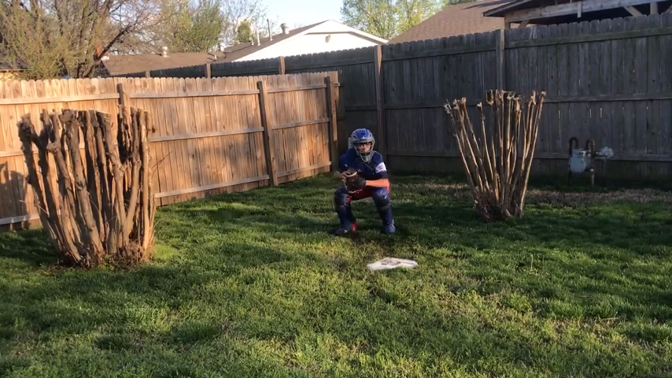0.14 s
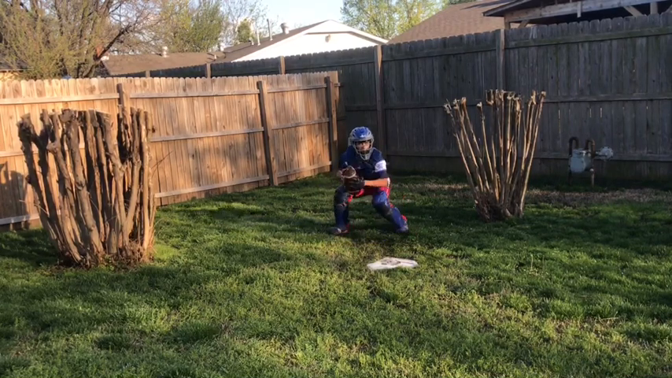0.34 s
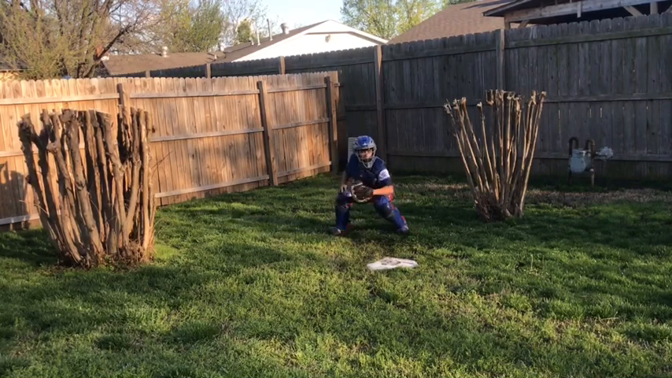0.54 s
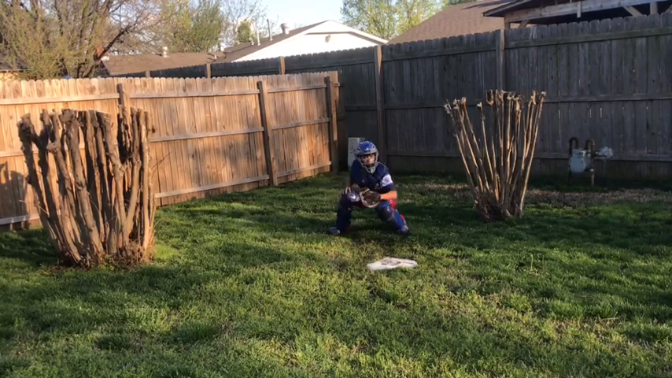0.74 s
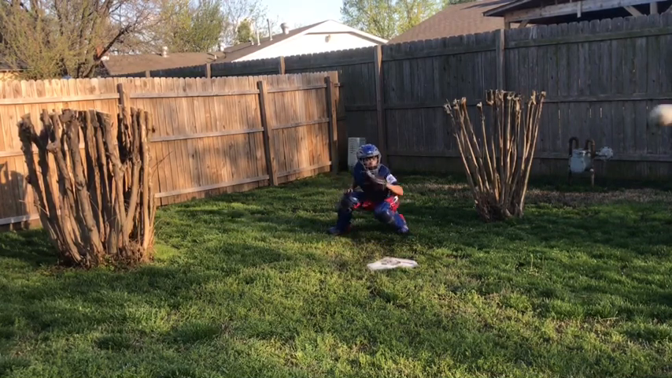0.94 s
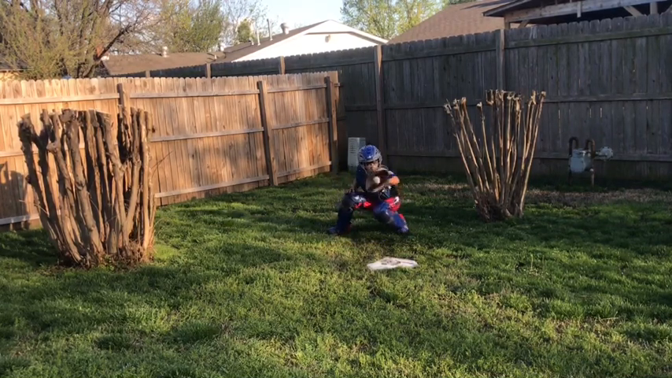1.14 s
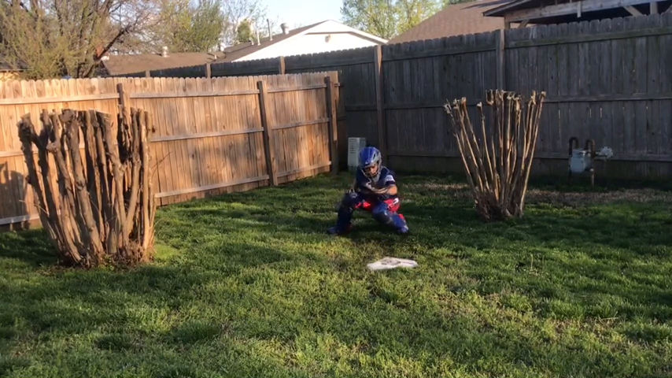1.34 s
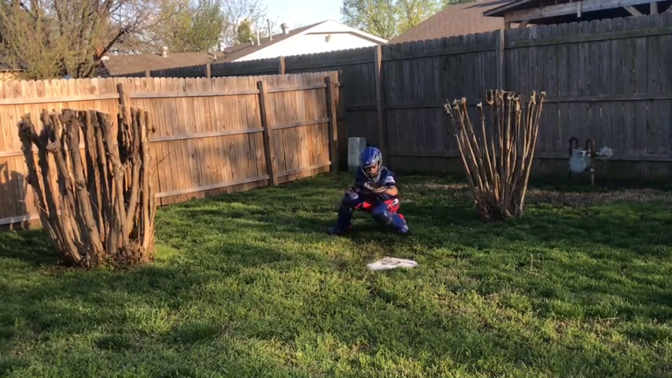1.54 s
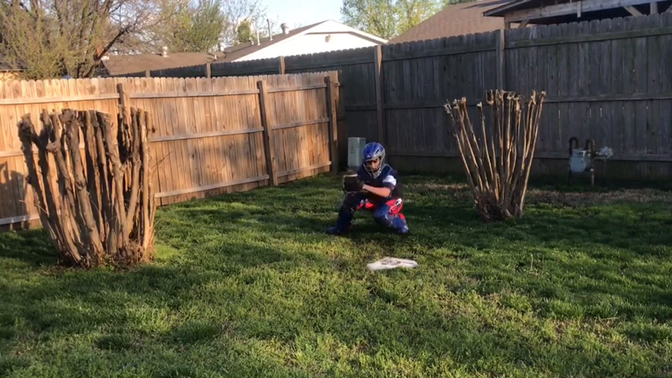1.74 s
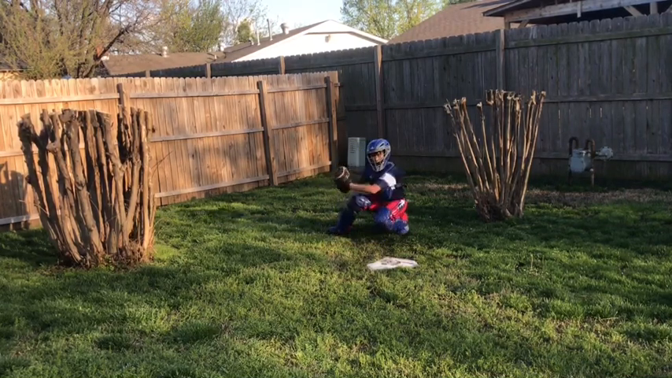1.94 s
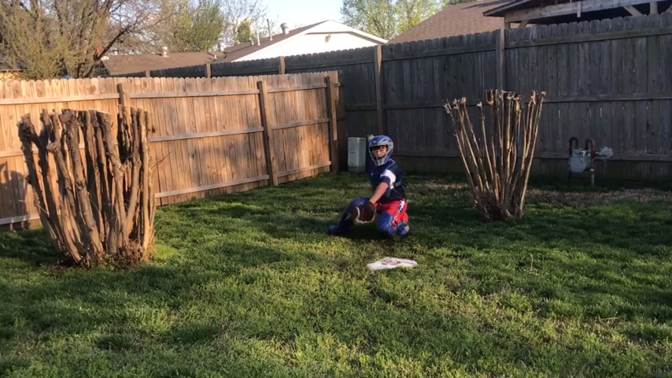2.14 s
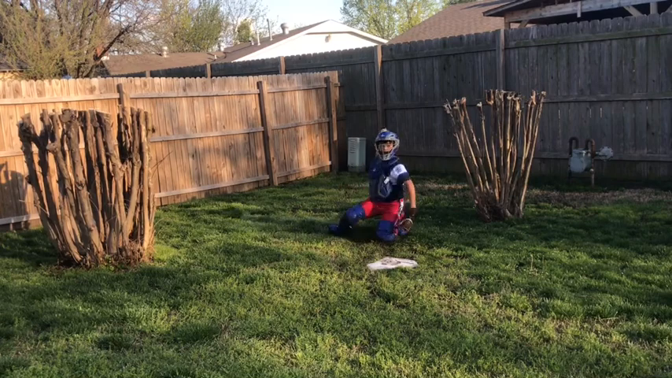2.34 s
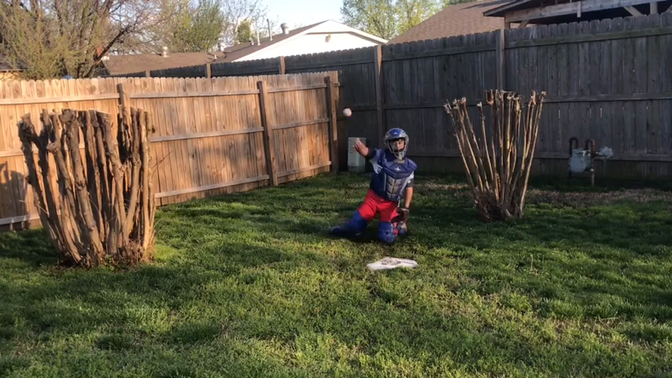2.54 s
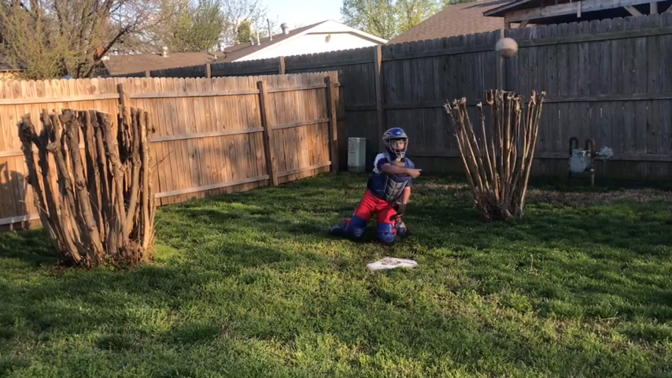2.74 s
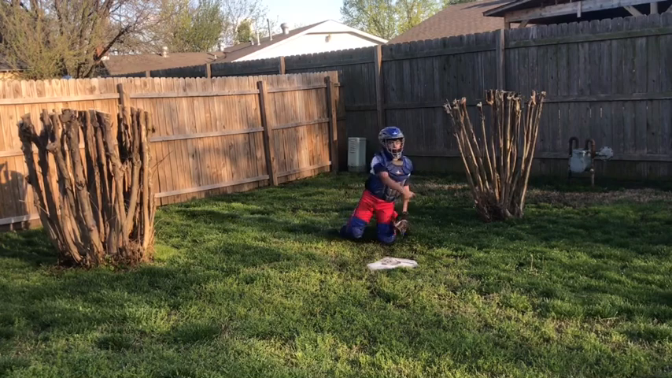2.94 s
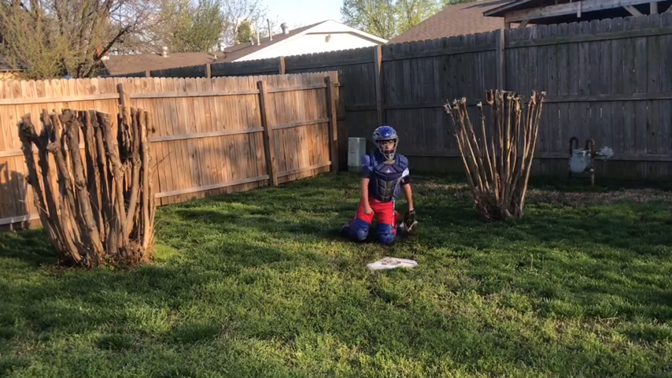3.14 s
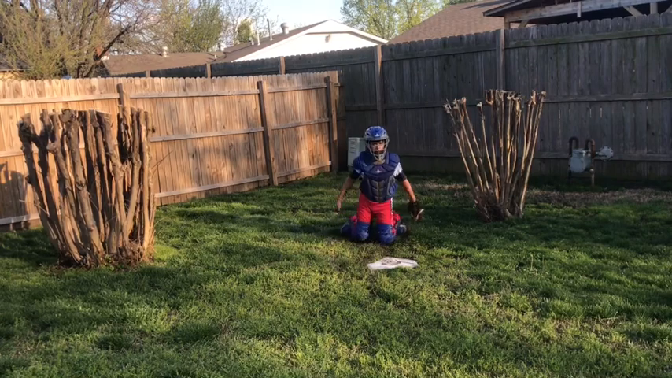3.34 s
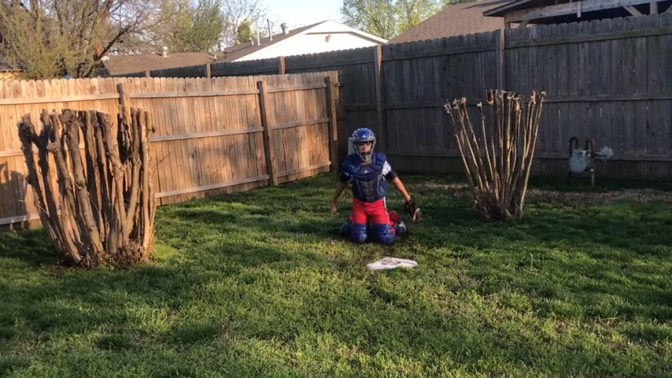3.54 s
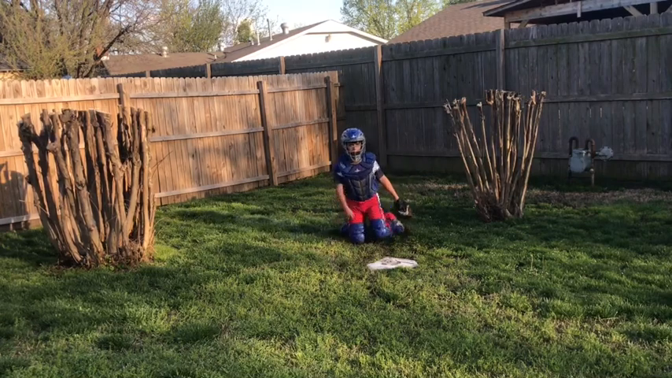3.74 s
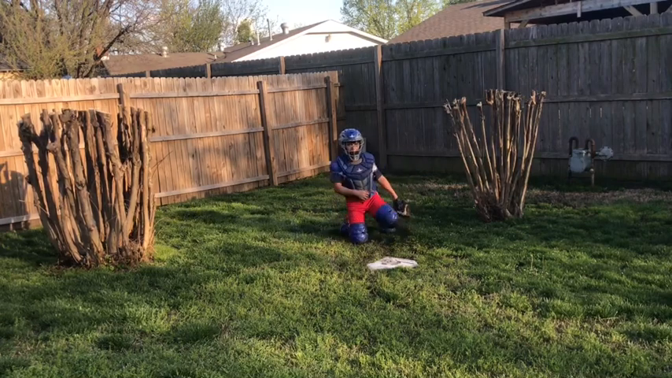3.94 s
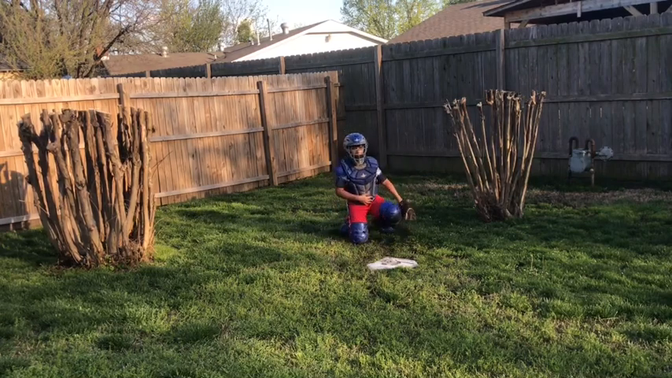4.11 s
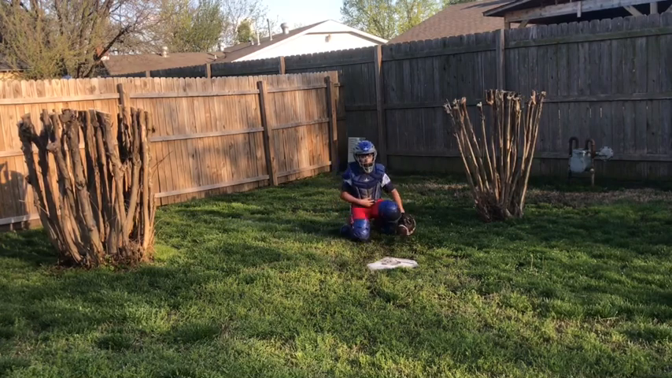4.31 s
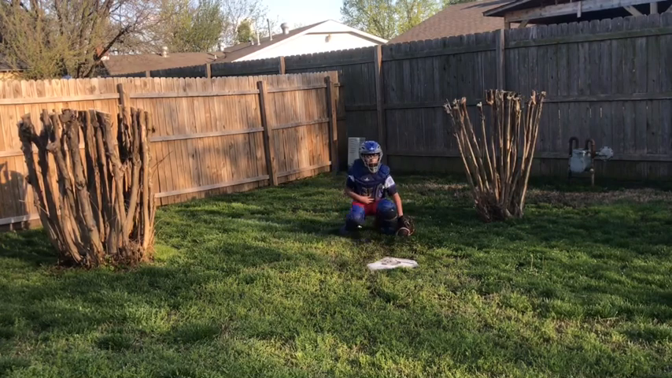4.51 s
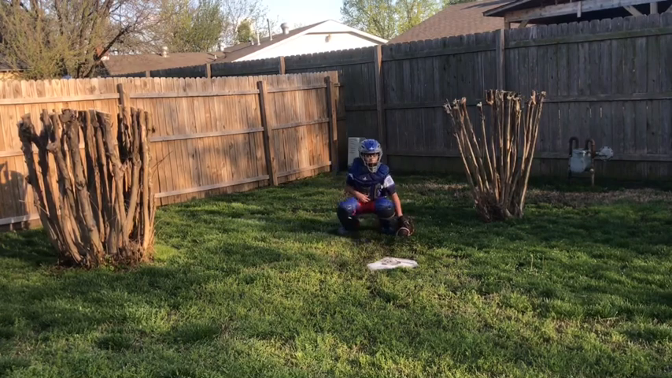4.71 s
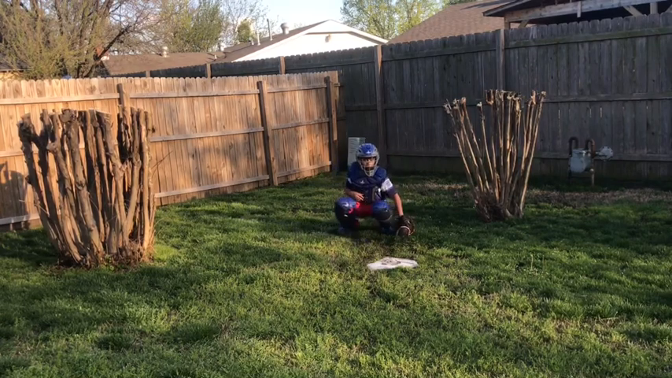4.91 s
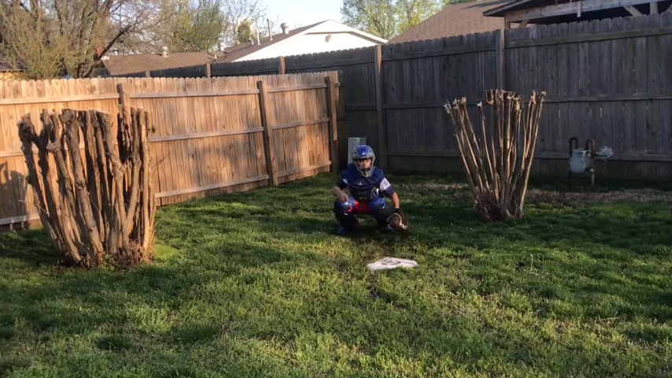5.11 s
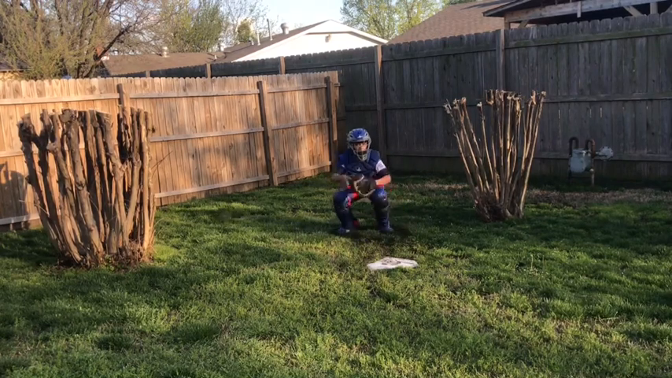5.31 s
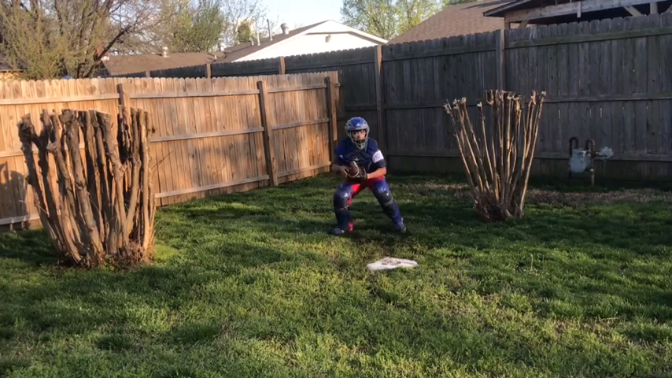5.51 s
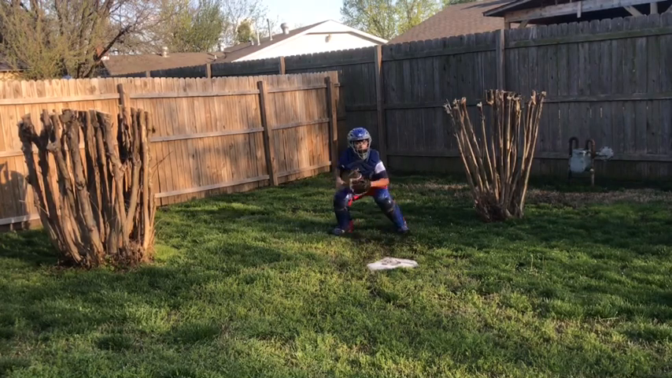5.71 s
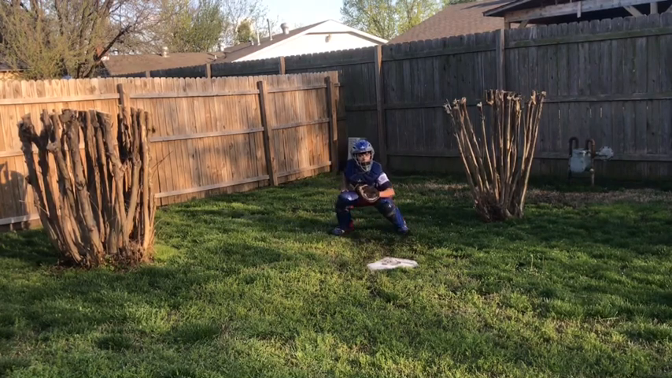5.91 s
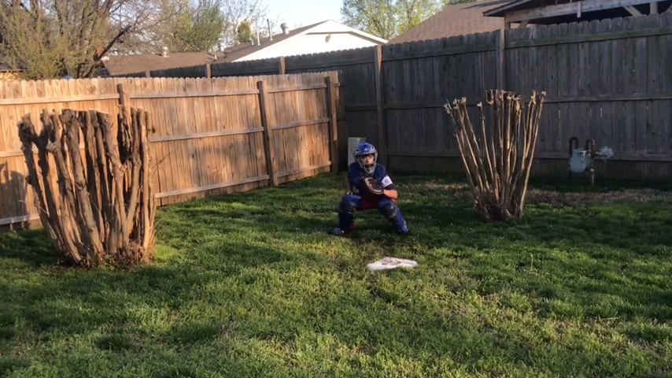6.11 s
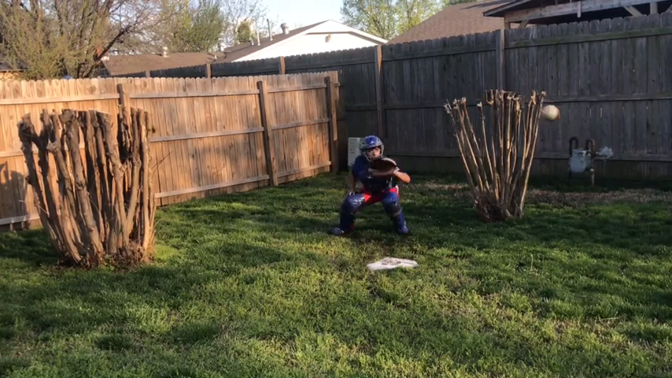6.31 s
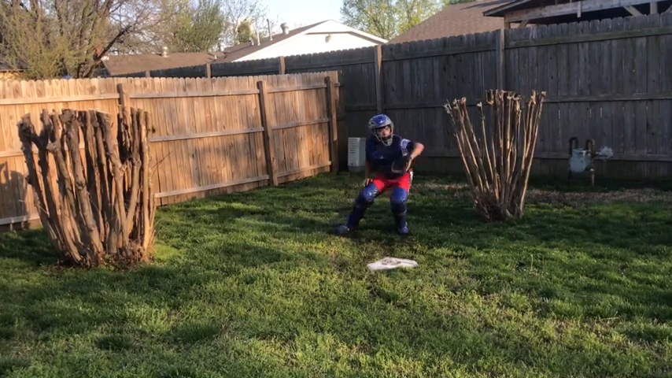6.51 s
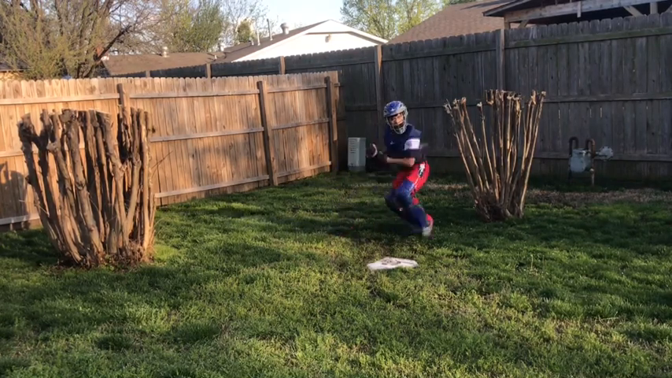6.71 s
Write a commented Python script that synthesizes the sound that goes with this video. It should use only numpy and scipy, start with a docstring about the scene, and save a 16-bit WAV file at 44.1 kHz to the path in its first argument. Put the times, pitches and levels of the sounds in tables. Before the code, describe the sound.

A fenced back yard with soft, uneven distant traffic rumble and faint hiss throughout. Brief bird chirps open the scene, with light cloth and grass swishes and tiny guard clicks around 0.2-0.6 s. At 1.16 s a ball smacks into a leather mitt across the lawn: a bright, dry crack, low padded thud, then quick fence echoes and a scattered fading tail. Small chirps and rustles follow; plastic gear clicks clearly near 2.57 s as the catcher throws. At 3.12 s the ball lands in a glove near the microphone, duller and rounder, with slightly later echoes. Quiet movement follows, with sparse chirps from 4.1 s becoming busier, whistling and warbling from 5 to 6.4 s. A buckle clicks near 5.5 s. At 6.48 s comes the strongest mitt smack, snappy and deep, its echoes overlapping a scuff of feet and small clicks at 6.65-6.7 s before the end.

```python
"""A fenced back yard, where two people play catch: a ball slaps into a leather mitt across the lawn, then into
a glove close by, then into the mitt again. Each slap is shaped noise with a ringing pocket and a low palm push.
Filtered copies and a scattered noise tail are the echoes of fences and houses. Guards click as short noise,
cloth and grass rustle as grainy hiss, birds whistle as gliding sines, and far traffic hums as coloured noise."""
import sys
import numpy as np
from scipy import signal
from scipy.fft import rfft, irfft, next_fast_len
from scipy.io import wavfile
from scipy.ndimage import map_coordinates

SR = 44100
rng = np.random.default_rng(int(sys.argv[2]) if len(sys.argv) > 2 else 0)


def bounce(signal):
    """Save signal as a 16-bit WAV file at the path given by the first command-line argument."""
    frames = np.transpose(np.atleast_2d(signal))
    limited = np.clip(frames, -1, 1)
    pcm = np.round(limited * 32767).astype(np.int16)
    wavfile.write(sys.argv[1], SR, pcm)


N = 298110


def amp(db):
    """Turn dB into gain."""
    return 10 ** (np.asarray(db) / 20)


def unit(x):
    """Scale to rms 1."""
    return x / np.sqrt(np.mean(x ** 2) + 1e-20)


def peaked(x):
    """Scale to peak 1."""
    return x / np.max(np.abs(x))


def along(points, hz):
    """Read a curve of (f/Hz, value) points on a log frequency axis."""
    f, v = np.transpose(points)
    return np.interp(np.log(hz + 1), np.log(f + 1), v)


def curve(rows, column):
    """Draw one column of a timed table as a value per sample."""
    rows = np.array(rows)
    return np.interp(np.arange(N) / SR, rows[:, 0], rows[:, column])


def filtered(x, response):
    """Filter x with a response given as a function of frequency."""
    m = next_fast_len(len(x) + 4096)
    return irfft(rfft(x, m) * response(np.fft.rfftfreq(m, 1 / SR)), m)[:len(x)]


def hiss(size, points):
    """Noise of rms 1 with the colour of the points."""
    return unit(filtered(rng.standard_normal(size), lambda hz: amp(along(points, hz))))


def wobble(rate, size=N):
    """A smooth random curve with rate knots a second, 900 at most."""
    knots = rng.standard_normal(size // 40)
    return map_coordinates(knots, [np.arange(size) * min(rate, 900) / SR])


def add(track, s, sound):
    """Mix a sound into the track at time s."""
    part = track[round(s * SR):][:len(sound)]
    part += sound[:len(part)]


# colour of the distant traffic: f/Hz, level/dB per Hz
TRAFFIC_COLOUR = [(15, -56), (28, -21), (65, 0.5), (103, -5.5), (160, -10), (214, -14), (399, -21.5),
                  (550, -21), (950, -20.5), (1700, -26), (2670, -33), (4360, -41), (7000, -47),
                  (10500, -52), (13300, -48), (16500, -57.5)]
# slow drift of the hum: t/s, rumble level/dB, tyre roar level/dB
HUM_LEVELS = [(0, -48.5, -54.5), (1, -48, -55.5), (2, -49, -56), (3, -51.5, -56.5), (4, -49.5, -56),
              (5.3, -50, -56.5), (6.76, -48.5, -57)]


def traffic():
    """Far engines rumble unevenly under a steadier roar of tyres and the hiss of the microphone."""
    def low(hz):
        return 1 / (1 + (hz / 350) ** 4)

    rumble = unit(filtered(hiss(size=N, points=TRAFFIC_COLOUR), low))
    roar = unit(filtered(hiss(size=N, points=TRAFFIC_COLOUR), lambda hz: 1 - low(hz)))
    rumble_db = curve(HUM_LEVELS, column=1) + 1.0 * wobble(4.0)
    roar_db = curve(HUM_LEVELS, column=2) + 0.15 * wobble(2.0) + 0.64 * wobble(15)
    return amp(rumble_db) * rumble + amp(roar_db) * roar


# bird notes, before flutter and distance: start t/s, length t/s, loudest point as share of length,
# start f/Hz, f/Hz when loudest, end f/Hz, level/dB
BIRD_NOTES = [(0, 0.022, .5, 2640, 2385, 2210, -41), (0.088, 0.083, 1, 4030, 4210, 4100, -56),
              (0.143, 0.067, 0.33, 3980, 3710, 3580, -48.5), (1.478, 0.03, 0.4, 4000, 3650, 3950, -53),
              (1.525, 0.045, 0.37, 3600, 3900, 3200, -51), (2.144, 0.034, 0.1, 3240, 3280, 3150, -48.5),
              (2.161, 0.019, .3, 6430, 6490, 6440, -50.5), (2.447, 0.034, 0.42, 3700, 3730, 3250, -51.5),
              (2.619, 0.042, .5, 3120, 3110, 3130, -56), (2.855, 0.027, 0.4, 3090, 3140, 3100, -60),
              (4.106, 0.063, 0.83, 4700, 3720, 3560, -56), (4.175, .042, 0.3, 3300, 3730, 3120, -52),
              (4.314, 0.1, 0.6, 2760, 2760, 2746, -55.5), (4.338, 0.046, .5, 5520, 5570, 5500, -64),
              (4.378, 0.082, 0.5, 6800, 8470, 5700, -63), (4.34, .02, .5, 4400, 4280, 4250, -65),
              (4.408, 0.037, .35, 3000, 3080, 3020, -55), (4.468, 0.058, 0.26, 6700, 7800, 5000, -62),
              (4.81, 0.069, 0.34, 4350, 4400, 4100, -64), (4.955, 0.14, 0.77, 3390, 3550, 3620, -53),
              (5.21, 0.028, 0.4, 2980, 2960, 3060, -51), (5.336, 0.11, 0.4, 3740, 4250, 3400, -53),
              (5.337, 0.0275, 0.5, 3700, 3520, 3000, -47), (5.285, 0.027, 0.6, 3840, 3580, 3500, -49.5),
              (5.635, 0.16, 0.74, 2970, 3450, 3463, -49), (5.692, 0.066, 0.2, 3050, 3100, 3230, -56),
              (5.884, .045, .2, 4450, 4265, 4150, -49), (5.933, 0.036, 0.44, 3930, 3600, 2840, -45),
              (5.908, 0.023, .5, 3500, 3250, 2900, -55), (6.077, 0.24, 0.5, 3153, 3254, 3267, -45.5),
              (6.27, 0.1, 0.4, 4500, 4350, 3730, -58.5), (6.335, .04, 0.54, 3460, 3890, 3800, -58),
              (6.4, 0.013, 0.46, 4460, 4300, 4200, -49), (6.411, 0.013, 0.45, 4450, 4300, 4150, -50),
              (6.361, 0.089, 0.7, 3940, 3920, 3850, -57)]
NOTE_START_DB, NOTE_END_DB = -10, -8  # under the loudest point of the note
FLUTTER_DB, HOARSE_SHARE = 4, .007  # unevenness of every note in level and pitch
# the faster a note glides, the more it warbles in pitch and drops out in level
FULL_WARBLE_HZ_PER_S, WARBLE_SHARE, WARBLE_DB = 6000, .016, 9
CHATTER_FAR_DB = 4  # warbling birds sit further off, so more of them arrives as smear
SMEAR_DB, SMEAR_T60_S = -3, .5


def birds():
    """Whistles bend in an arc of pitch; steady ones stay clear, gliding ones warble; distance smears them."""
    near, far = np.zeros(N), np.zeros(N)
    hoarse, flutter = wobble(180), wobble(90)
    for s, length, loudest, *pitch_hz, db in BIRD_NOTES:
        t = np.arange(0, length, 1 / SR)
        at = slice(round(s * SR), round(s * SR) + len(t))
        shares = [0, np.clip(loudest, .15, .85), 1]
        glide_hz_per_s = np.ptp(pitch_hz) / length
        warble = min(glide_hz_per_s / FULL_WARBLE_HZ_PER_S, 1) ** 2
        arc_hz = np.polyval(np.polyfit(shares, pitch_hz, 2), t / length)
        hz = arc_hz * (1 + (HOARSE_SHARE + WARBLE_SHARE * warble) * hoarse[at])
        swell_db = np.interp(t / length, shares, [NOTE_START_DB, 0, NOTE_END_DB])
        swell_db = swell_db - (FLUTTER_DB + WARBLE_DB * warble) * np.abs(flutter[at])
        edges = np.clip(np.minimum(t, length - t) / 0.00088, 0, 1)  # short fades against clicks
        note = amp(db + swell_db) * edges * np.sin(2 * np.pi * np.cumsum(hz) / SR)
        add(near, s, note * amp(-CHATTER_FAR_DB * warble / 2))
        add(far, s, note * amp(CHATTER_FAR_DB * warble))
    size = SR // 2
    smear_db = -60 * np.arange(size) / SR / SMEAR_T60_S + 1.2 * wobble(121.3, size=size)
    smear = rng.standard_normal(size) * amp(smear_db)
    return near + amp(SMEAR_DB) * signal.fftconvolve(far, smear / np.linalg.norm(smear))[:N]


# swishes of cloth and grass: middle t/s, spread t/s, hiss level/dB, body level/dB
SWISHES = [(.23, 0.024, -67, -59.5), (.3, 0.018, -58.5, -54.5), (.36, 0.036, -73, -60),
           (.54, 0.016, -68, -73), (.575, 0.032, -89, -57.5), (1.42, 0.084, -80, -59),
           (1.78, 0.047, -72, -76), (2.09, 0.035, -72, -59), (2.28, 0.11, -66.5, -67),
           (2.56, 0.077, -64, -57.5), (2.78, 0.077, -69, -71), (3.58, 0.08, -68.5, -71),
           (4.33, 0.075, -68.5, -62), (5.42, 0.017, -65.5, -60), (5.52, 0.054, -62.5, -55.5),
           (6.22, 0.067, -69.5, -66.5), (6.63, 0.073, -69, -46), (6.7, 0.053, -69, -38)]
# colour of the thin hiss: f/Hz, level/dB per Hz
FABRIC_COLOUR = [(1500, -25), (4000, 6), (6000, 5.5), (9000, 2), (13000, -3), (16000, -4)]
# colour of the scuffing body: f/Hz, level/dB per Hz
SCUFF_COLOUR = [(150, 1.5), (600, -6), (1500, 0.5), (3000, -2), (5000, -9), (8000, -28.5)]


def rustle():
    """Each swish swells and fades: a hiss that crackles in fine clumps, with a duller body when feet scuff."""
    t, thin, full = np.arange(N) / SR, 0, 0
    for s, spread, hiss_db, body_db in SWISHES:
        swell = np.exp(-.5 * ((t - s) / spread) ** 2)
        thin = thin + amp(hiss_db) * swell
        full = full + amp(body_db) * swell
    grain = amp(1.8 * wobble(70) + 2.4 * wobble(500))
    fabric = unit(grain * hiss(size=N, points=FABRIC_COLOUR))
    scuff = unit(grain * hiss(size=N, points=SCUFF_COLOUR))
    return thin * fabric + full * scuff


# clicks of plastic guards and buckles: t/s, click level/dB, centre f/Hz, knock level/dB over the click
GEAR_CLICKS = [(.39, -47.5, 5560, 12.5), (0.521, -44.5, 5960, -14), (2.078, -43, 4370, -13),
               (2.0993, -45, 4380, -12), (2.5, -46, 7250, 13), (2.5158, -50, 3500, -8),
               (2.565, -26.5, 3380, -12), (2.5715, -29, 2570, -22), (2.5858, -40.5, 5060, -14),
               (2.657, -45, 6000, -12), (4.264, -52, 4030, -14), (5.08, -54, 6060, -11),
               (5.487, -40, 4350, -11), (5.5178, -47.5, 4500, 6.5), (6.6525, -47, 9000, -16),
               (6.669, -40, 3000, -12), (6.688, -34, 4000, -22), (6.7017, -49, 4000, -22)]


def gear():
    """Hard plastic clicks: a burst of noise and shell pitch, with a small hollow knock."""
    out, t = np.zeros(N), np.arange(SR // 40) / SR
    for s, db, hz, knock_db in GEAR_CLICKS:
        colour = [(hz / 4, -25), (hz / 2.0, -3), (hz, 0), (hz * 3, -9), (hz * 6, -20)]
        shell = np.sin(2 * np.pi * hz * t)  # the shell rings briefly at its own pitch
        click = peaked((hiss(size=len(t), points=colour) + shell) * amp(-60 * t / 0.018))
        knock = amp(knock_db - 60 * t / 0.013) * np.sin(2 * np.pi * 950 * t)
        add(out, s, amp(db) * (click + knock))
    return out


# leather contacts of ball and fingers: t/s, crack level/dB, pocket ring level/dB over the crack,
# bite level/dB, treble level/dB over the crack, t60/s of the crack
LEATHER_CONTACTS = [(1.1564, -9, -17, 9, -2, 0.0094), (1.159, -13, 9, 1, 1, 0.013),
                    (1.161, -4, -30, 4, -8.5, 0.0094), (3.1128, -29, 2, 3, -5, 0.017),
                    (3.1162, -9.5, -7, 6.5, -20, 0.017), (3.1182, -27, -17, 5, -28, 0.057),
                    (6.4531, -31, -17, -1, -13, 0.02), (6.4648, -35.5, 2, 4, -23, .03),
                    (6.4732, -22.5, -1, 3, -22, 0.028), (6.4763, -0.5, -21.5, -2, -8, 0.0047),
                    (6.4777, -8, -8.5, 8, -13.5, 0.045), (6.4843, -19.5, -18, 0, 4, 0.016),
                    (6.4878, -11.5, -16, -1, -19, 0.0077)]
# colour of the crack before its bite: f/Hz, level/dB per Hz
CRACK_COLOUR = [(400, -25), (1200, 4.5), (1800, 3.5), (3200, -4.5), (5000, -9), (7000, -21.5), (16000, -38)]
# colour of the treble spit: f/Hz, level/dB per Hz
SPIT_COLOUR = [(3000, -36), (6000, -1.5), (10000, -6.5), (16000, -11.5)]
POCKET_HZ, BITE_HZ = 899, 3600


def leather():
    """Each contact is a short crack, a treble spit and a few swings of the air in the pocket."""
    out, t = np.zeros(N), np.arange(SR // 20) / SR
    for s, db, ring_db, bite_db, treble_db, t60 in LEATHER_CONTACTS:
        fall = amp(-60 * t / max(t60, .003)) * (1 - np.exp(-t / 0.00054))
        bite_points = [(BITE_HZ / 1.8, 0), (BITE_HZ, bite_db), (BITE_HZ * 1.5, 0)]
        bitten = filtered(hiss(size=len(t), points=CRACK_COLOUR), lambda hz: amp(along(bite_points, hz)))
        crack = peaked(bitten * fall)
        spit = peaked(hiss(size=len(t), points=SPIT_COLOUR) * fall ** 2.0)
        ring_fall = amp(-60 * t / 0.0063) * (1 - np.exp(-t / 0.0014))
        ring = peaked(np.sin(2 * np.pi * POCKET_HZ * t) * ring_fall)
        add(out, s, amp(db) * (crack + amp(treble_db) * spit - amp(ring_db) * ring))
    return out


# how the yard answers each catch: t/s, place;
# echoes: sooner t/s, level/dB, bass level/dB, treble level/dB, board ring level/dB;
# scattered tail: level/dB, build-up t/s, bass level/dB, treble level/dB, t60 stretch (factor), far houses level/dB
YARD_ANSWERS = [(1.16, "mitt", 0.0015, -10.5, 8, -4.5, -12.5, -30.5, 0.003, 2, 0, 1.01, -8.5),
                (3.116, "glove", 0, -1, -2, 1, -13, -29, 0.026, -7.5, -4.5, 1.33, -10),
                (6.48, "mitt", 0.001, -0.5, -5, 1.5, -11, -21.5, 0.0071, -2.5, 1.5, 1.2, -15)]
# colour of the scattered tail before its shelves: f/Hz, level/dB per Hz
TAIL_COLOUR = [(40, -45), (70, -18.5), (190, -3), (250, -4.5), (400, -9), (600, -5), (900, -10.5),
               (1450, -7.5), (2600, -17), (5000, -21), (9000, -26), (16000, -44.5)]
# decay of the tail before its stretch: f/Hz, t60/s
TAIL_T60 = [(80, 0.26), (240, 0.86), (560, 0.2), (1470, 0.3), (3880, 0.31), (10200, 0.17)]


def yard():
    """Many small reflections merge into a lumpy tail, each band dying at its own rate; far houses answer longer."""
    out = np.zeros(N)
    for s, *_, db, build, bass_db, treble_db, stretch, far_db in YARD_ANSWERS:
        hz, t, bands = signal.stft(hiss(size=SR, points=TAIL_COLOUR), SR, nperseg=256)
        fall_db = -60 * t / (stretch * along(TAIL_T60, hz)[:, None])
        shelves = [(450, bass_db), (800, 0), (4500, 0.0084), (8000, treble_db)]
        far_houses = amp(far_db + fall_db / 2.6)
        bands = bands * amp(along(shelves, hz)[:, None]) * (amp(fall_db) + far_houses)
        tail = signal.istft(bands, SR, nperseg=256)[1][:SR]
        lumps = amp(2.7 * wobble(199.7, size=SR))
        rise = 1 - np.exp(-(np.arange(SR) / SR / build) ** 2)
        add(out, s, amp(db) * tail * lumps * rise)
    return out


# the padded palm giving way under the ball: t/s, level/dB, f/Hz
PALM_THUMPS = [(1.1609, -13.5, 348), (1.1635, -14.5, 184), (3.1164, -19, 410), (3.1201, -21, 190),
               (6.479, -7.5, 275), (1.162, -26, 110), (6.476, -19.5, 125)]


def palm():
    """A soft low push that swings about one and a half times."""
    out, t = np.zeros(N), np.arange(SR // 20) / SR
    for s, db, hz in PALM_THUMPS:
        swing = np.sin(2 * np.pi * hz * t) * (t * hz) ** 2 * np.exp(-3.2 * t * hz)
        add(out, s, -amp(db) * peaked(swing))
    return out


# own pitches of the fence boards: f/Hz, drive level/dB, t60/s
BOARD_MODES = [(194.9, -23.5, 0.78), (239, -15.5, 0.55), (344, -1, 0.13), (597, 4.5, 0.085),
               (900, -5.5, 0.07), (1270, -5, 0.063)]


def boards(hz):
    """The fence answers a blast of sound as a bank of damped resonances."""
    response = 0
    for mode_hz, db, t60 in BOARD_MODES:
        damping = 1j * hz * np.log(1000) / np.pi / t60
        response = response + amp(db) * 100j * hz / (mode_hz ** 2 - hz ** 2 + damping)
    return response


# fences and walls that return the catch, by place, relative to that catch's echo settings:
# delay t/s, level/dB, bass level/dB, treble level/dB
WALL_RETURNS = {"mitt": [(.0217, -5.5, -3.5, -5), (.0388, -11.5, -2, -12), (.0497, -14, -6, -8),
                (.0567, -22, -2, -9), (.0937, -12.5, -12, -4.5), (.1035, -22, 0, -7), (.121, -23, -11, -9)],
                "glove": [(.027, -22, 7, -5), (.0468, -3.5, -2, 2), (.0515, -11, -6, -6),
                (.0718, -9, -11, -1), (.0806, -10, -2, -1), (.149, -21, -7, -8), (.158, -19, -9, -14)]}
# time until the nearest fence rings, by place, before the catch's sooner shift: t/s
FENCE_DELAY = {"mitt": .019, "glove": .047}
CATCH_S = .05  # taken on either side of the catch
THIN_BOARDS_DB = -16  # the deepest bass passes through the fences instead of returning


def echoes(hits):
    """Every wall sends the whole catch back, later, weaker and recoloured; the nearest fence rings on."""
    out = np.zeros(N)
    for s, place, sooner, db, bass_db, treble_db, ring_db, *_ in YARD_ANSWERS:
        first = round((s - CATCH_S) * SR)
        catch = np.pad(hits[first:][:round(2 * CATCH_S * SR)], (0, SR // 2))

        def late(hz, delay):
            return np.exp(-2j * np.pi * hz * (delay - sooner))

        def walls(hz):
            total = 0
            for delay, wall_db, low_db, high_db in WALL_RETURNS[place]:
                bass = bass_db + low_db
                shelves = [(150, bass + THIN_BOARDS_DB), (320, bass), (550, bass),
                           (800, 0.01), (2800, 0), (7000, treble_db + high_db)]
                total = total + amp(db + wall_db + along(shelves, hz)) * late(hz, delay)
            return total

        ring = filtered(catch, lambda hz: boards(hz) * late(hz, FENCE_DELAY[place]))
        uneven_ring = amp(ring_db + 5.2 * wobble(41, size=len(ring))) * ring
        add(out, first / SR, filtered(catch, walls) + uneven_ring)
    return out


def scene():
    """Everything as one microphone hears it."""
    hits = leather() + palm()
    background = traffic() + birds() + rustle() + gear()
    return (background + hits + yard() + echoes(hits))[None]


CEILING, TOP_HZ = .95, 15830  # full-scale share, band limit


def record(dry):
    """The loudest peaks round off against the ceiling; nothing is kept above the band limit."""
    rounded = dry[0] / (1 + np.abs(dry[0] / CEILING) ** 4) ** (1 / 4)
    return filtered(rounded, lambda hz: hz < TOP_HZ)[None]


dry = scene()
out = record(dry)
bounce(out)
```